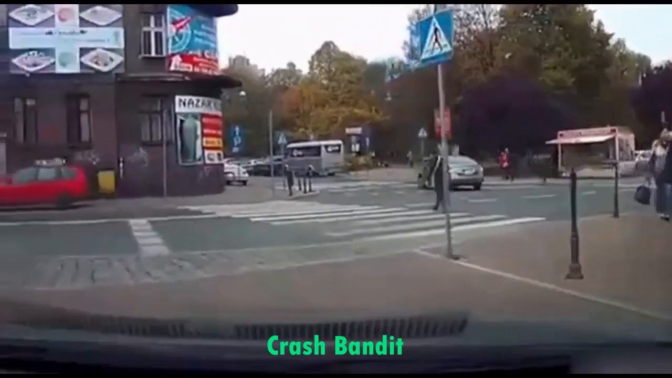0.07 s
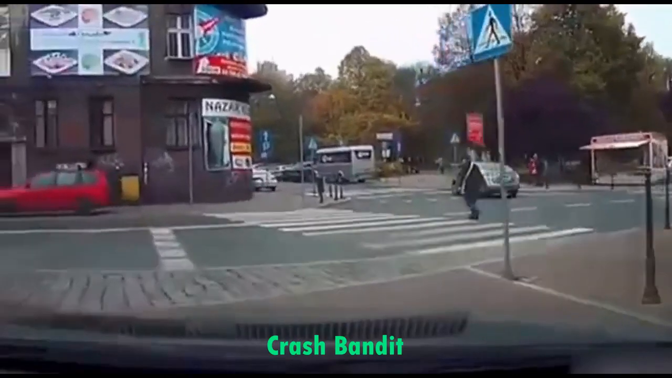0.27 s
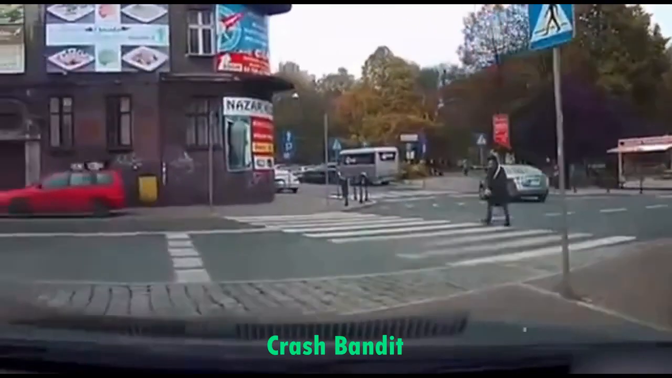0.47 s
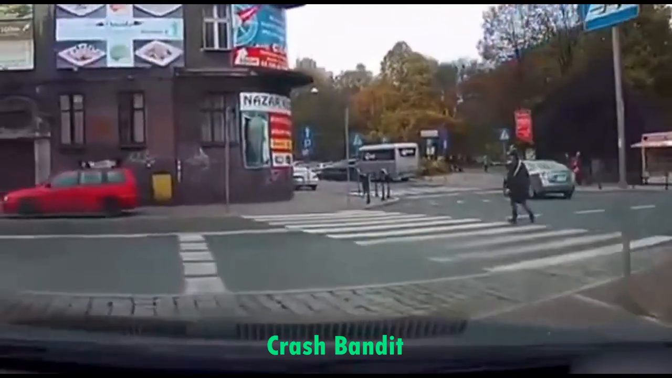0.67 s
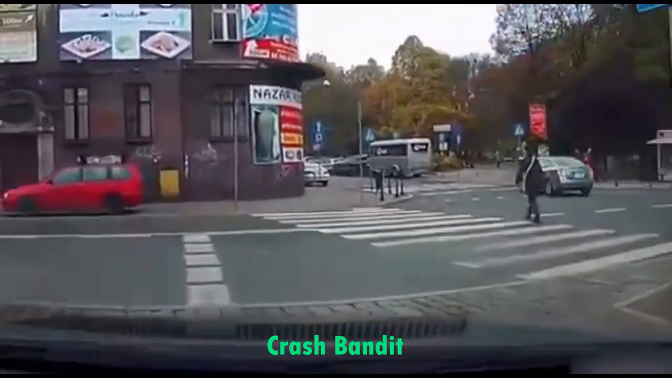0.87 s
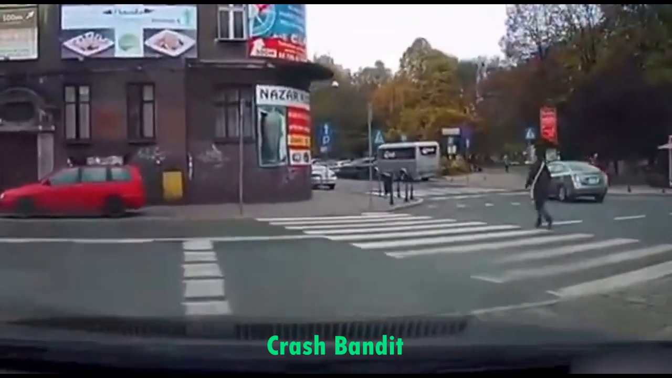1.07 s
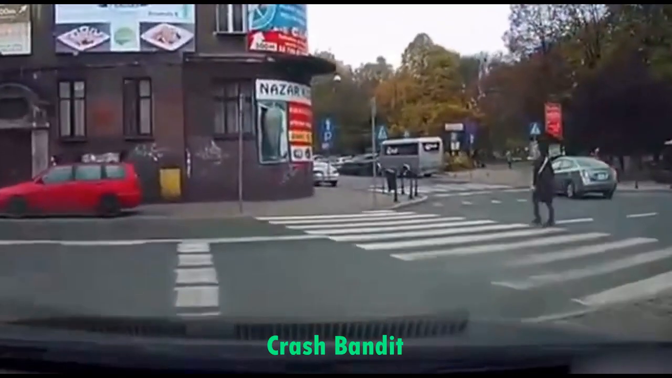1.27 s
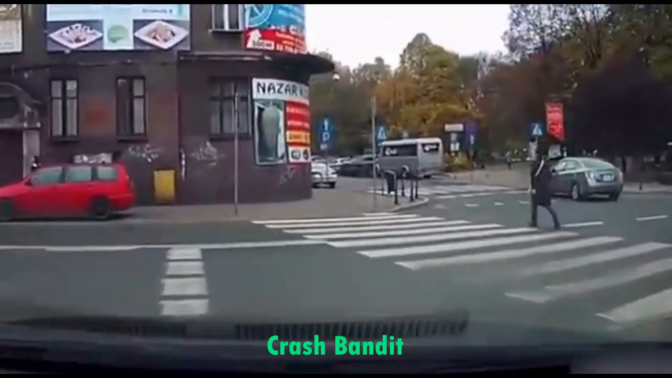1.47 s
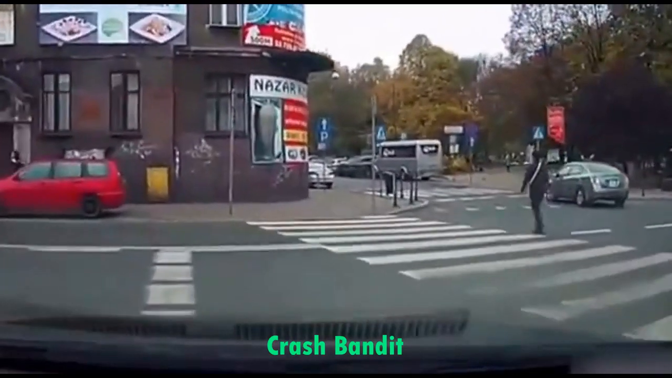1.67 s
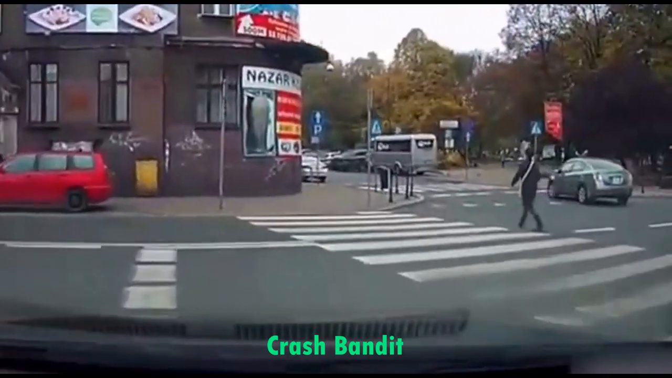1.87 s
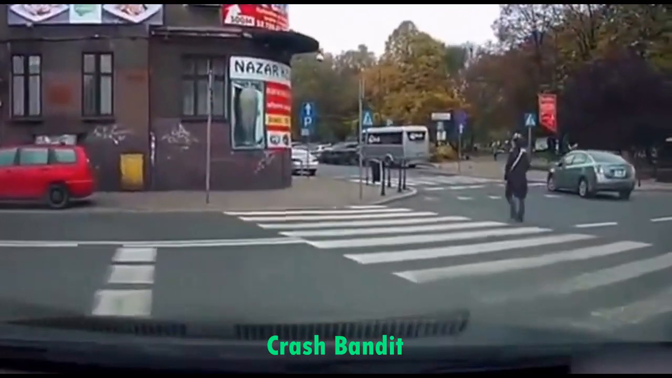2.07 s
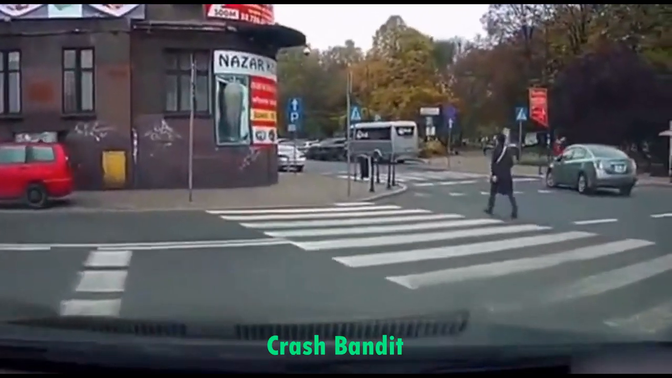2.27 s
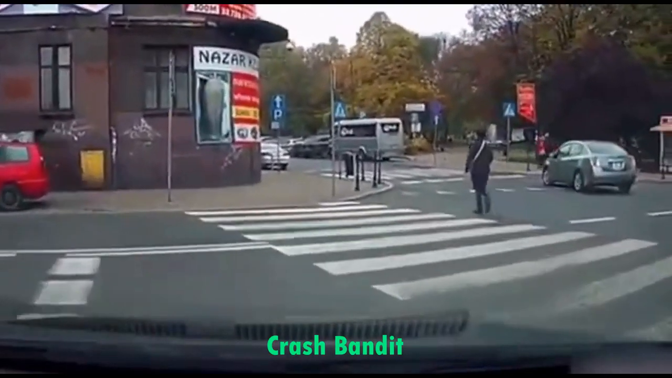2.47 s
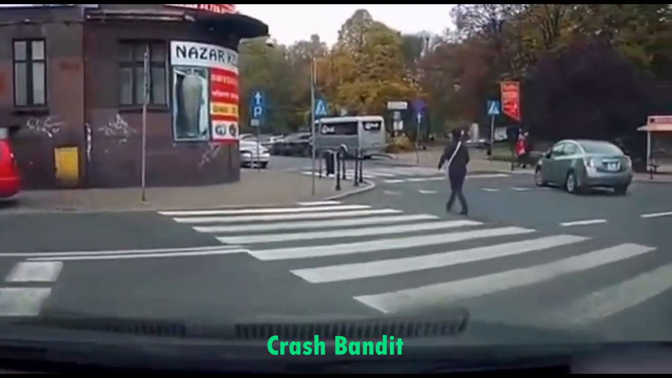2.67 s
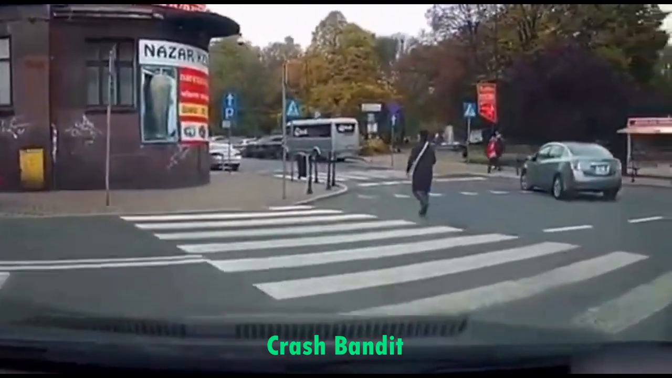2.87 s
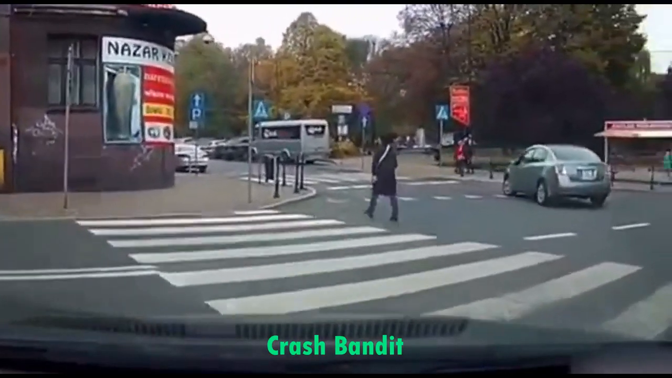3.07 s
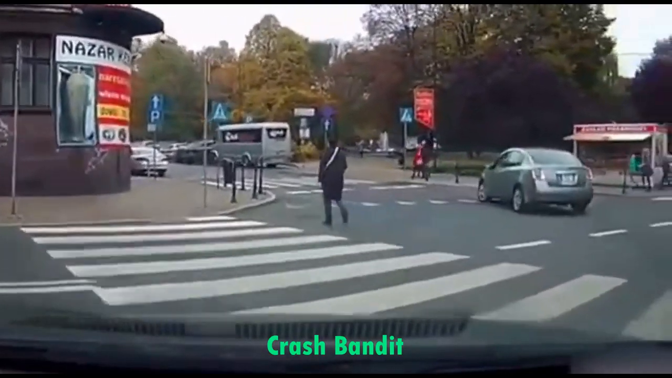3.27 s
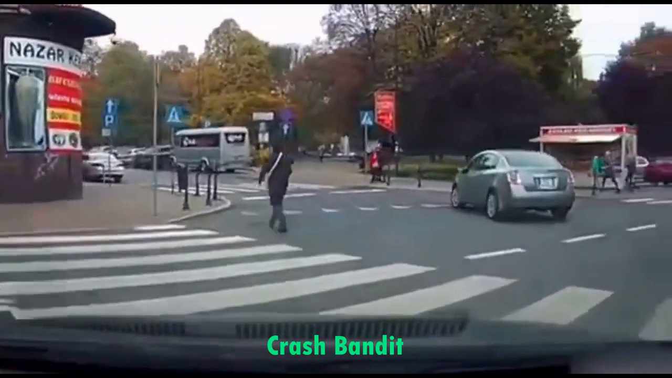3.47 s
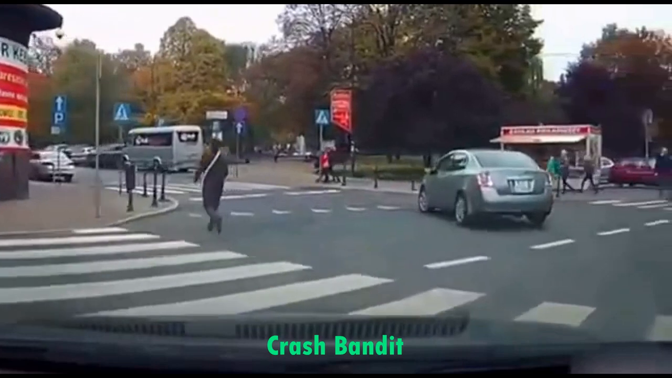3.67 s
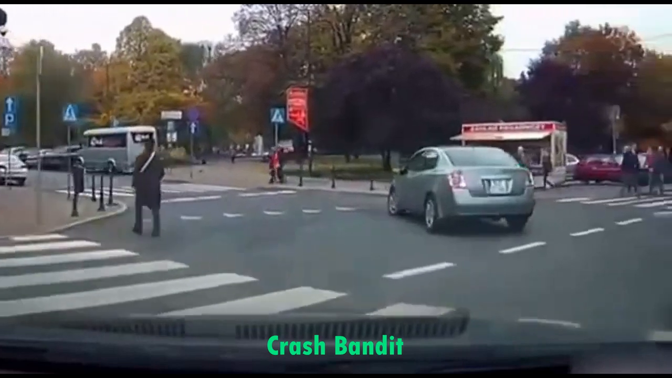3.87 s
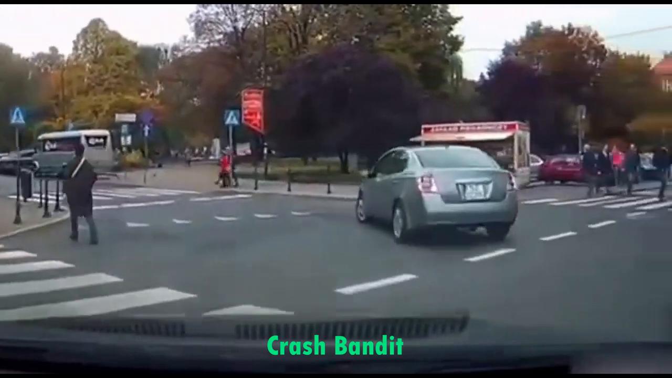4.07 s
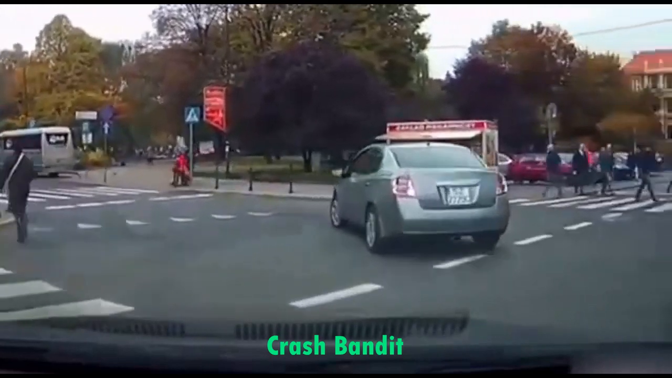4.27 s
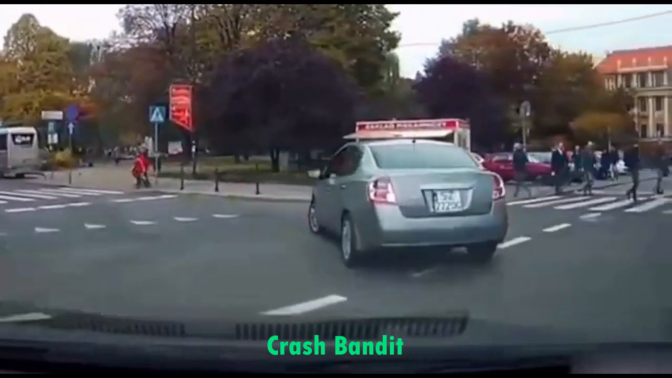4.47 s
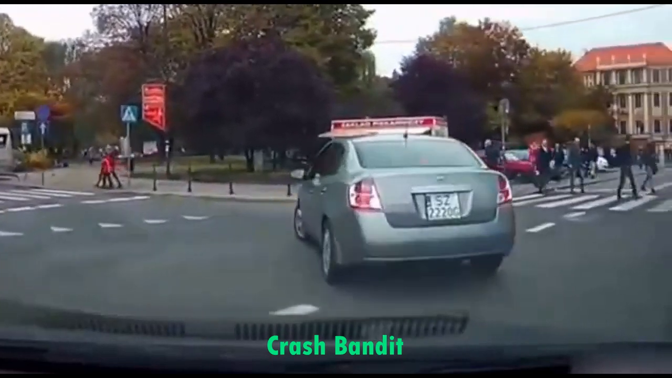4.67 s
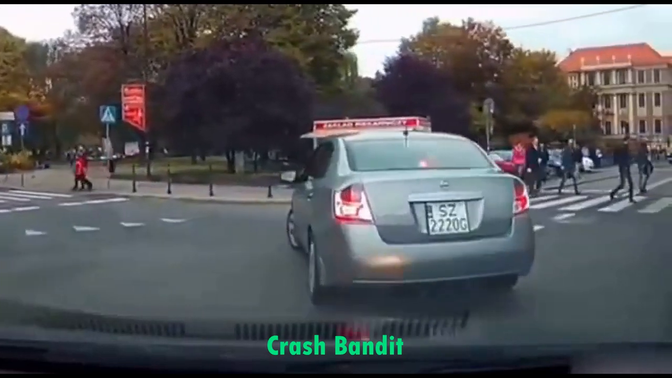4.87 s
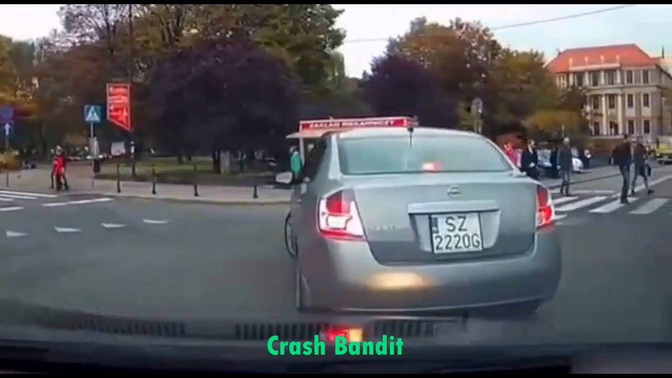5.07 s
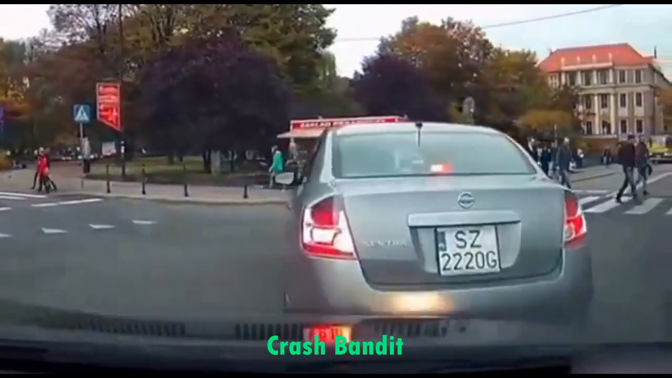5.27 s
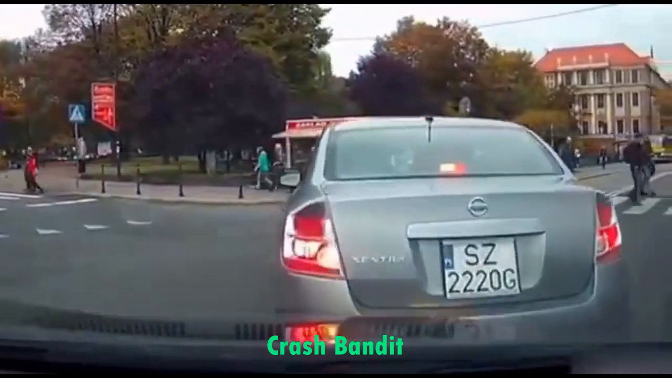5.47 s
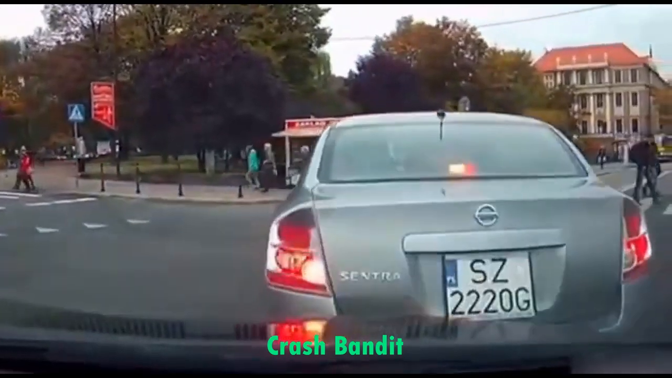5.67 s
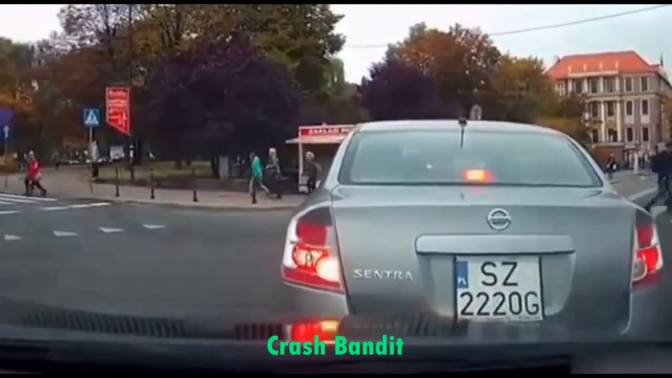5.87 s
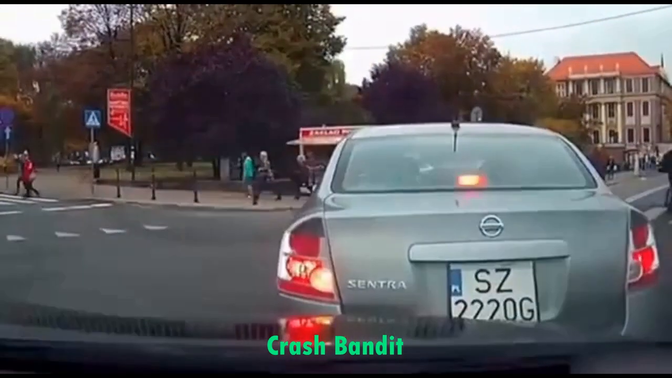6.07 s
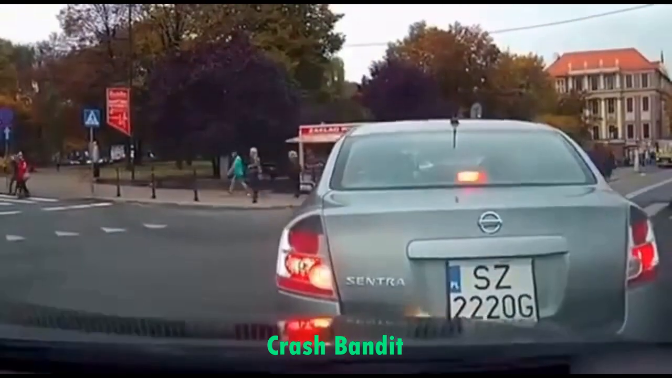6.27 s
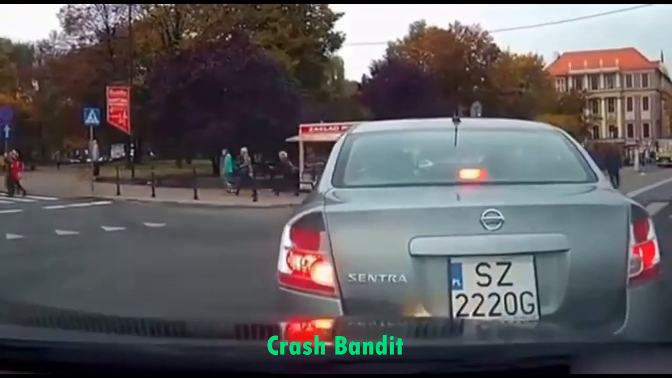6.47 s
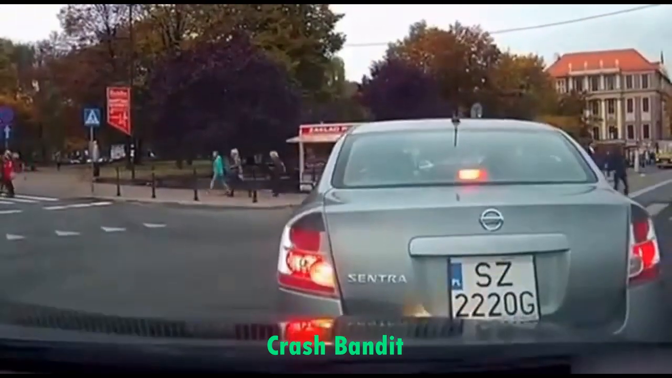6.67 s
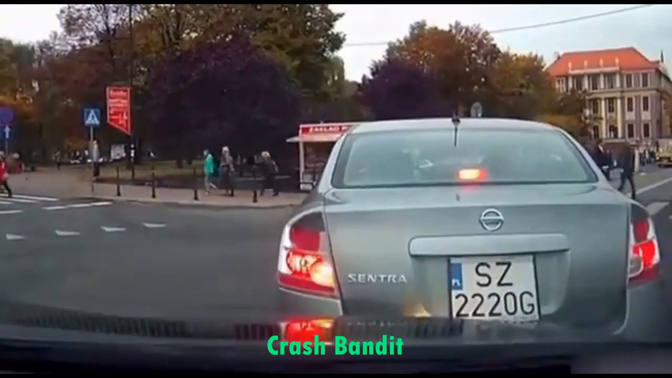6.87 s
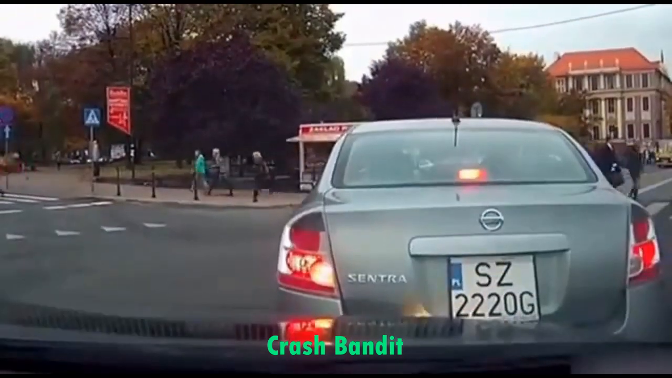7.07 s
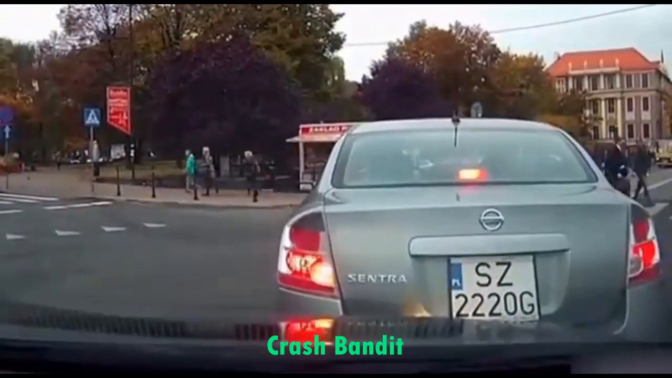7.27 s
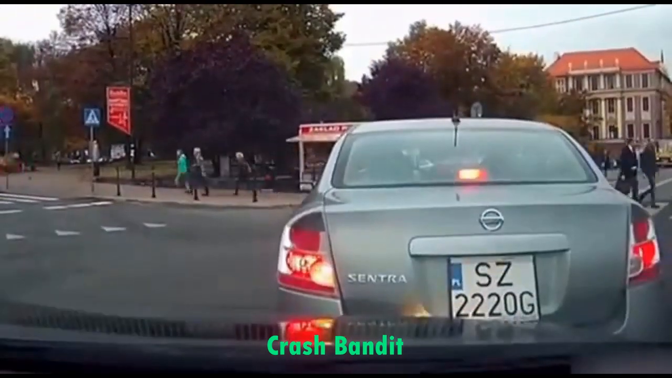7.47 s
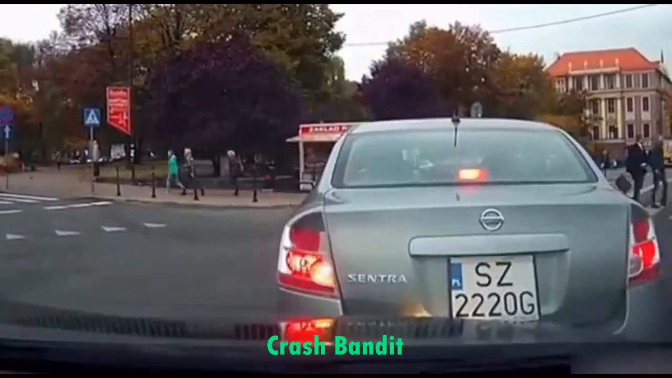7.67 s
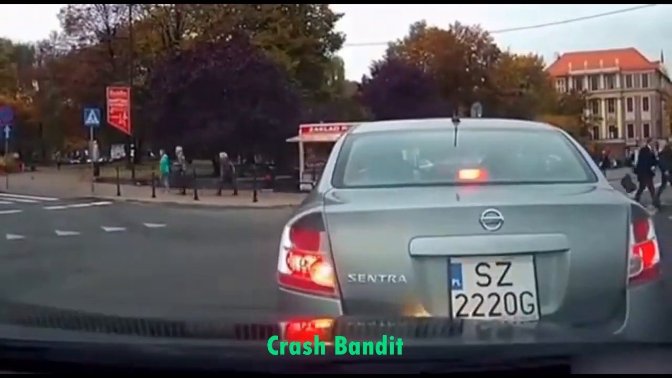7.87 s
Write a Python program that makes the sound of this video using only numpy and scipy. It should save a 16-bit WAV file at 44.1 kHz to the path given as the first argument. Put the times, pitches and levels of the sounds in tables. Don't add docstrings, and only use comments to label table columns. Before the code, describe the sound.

Heard from a microphone behind the windscreen, a car drones through a junction, wheels booming over paving seams and trim ticking lightly. The engine note sinks, rises briefly mid-turn, then drops as the car brakes. It hits the car ahead with one sudden heavy thud, ringing panels and crunching bumper plastic. Loose plastic rattles and tiny metal pieces tinkle faintly, then the engine settles to a low idle.

```python
import sys
import numpy as np
from scipy import signal
from scipy.fft import rfft, irfft, next_fast_len
from scipy.io import wavfile
from scipy.ndimage import uniform_filter1d

SR = 44100
rng = np.random.default_rng(int(sys.argv[2]) if len(sys.argv) > 2 else 0)


def volts_from_db(level):
    exponent = np.asarray(level, float) / 20
    return 10 ** exponent


def dump_mix(stems):
    frames = np.atleast_2d(stems).T
    limited = np.clip(frames, -1, 1)
    pcm = np.round(limited * 32767).astype(np.int16)
    wavfile.write(sys.argv[1], SR, pcm)


N = 349391

# (time [s], peak [dB], brightness [dB per octave], panel struck [Hz])
BUMP_BLOWS = [(5.6825, -16, -5, 151), (5.688, -13.5, 5.5, 329), (5.693, -8, 1, 243), (5.709, -33, 2, 1500),
              (5.714, -13, 4, 539), (5.756, -31, 0, 1107), (5.808, -25, -1, 130), (5.835, -16, -4.5, 290),
              (5.868, -22, 5, 100.3), (5.97, -27.5, -10.5, 890), (6.005, -30, 0, 700),
              (6.03, -29, -1, 1000), (6.115, -35, 4, 394)]


def bump():
    blows = body(BUMP_BLOWS, gain_db=-14.0, boom_db=-8.5, ring_share=0.82, contact_s=0.025)
    return signal.lfilter([0.45], [1, -0.55], blows)


# (pitch [Hz], level [dB], time to fall 60 dB [s])
BODY_MODES = [(31.6, 0, 0.84), (79, -0.5, 0.11), (128, 0.5, 0.057), (205, -9.5, 0.3), (251.5, 3, 0.12),
              (329, 2.5, 0.11), (432.5, -5.5, 0.14), (539, -5.5, 0.12), (700, 1, 0.012),
              (900, -11.5, 0.098), (1000, -16, 0.11), (1080, -11.5, 0.045), (1380, -26, 0.01),
              (1700, -27.5, 0.023), (2200, -30, 0.047), (2600, -27, 0.04), (2850, -29.5, 0.012),
              (3400, -35.5, 0.0098)]


def body(hits, gain_db, boom_db, ring_share, contact_s):
    times, peak_db, bright_db, panel_hz = np.transpose(hits)
    chance = rng.standard_normal((len(hits), len(BODY_MODES)))
    out = np.zeros(N)
    for k, (hz, mode_db, t60) in enumerate(BODY_MODES):
        tilt_db = bright_db * np.log2(hz / 250) + boom_db * (hz < 100)
        panel_db = 8 * np.exp(-(np.log2(hz / panel_hz) / 0.26) ** 2)
        hit_db = peak_db + gain_db + mode_db + tilt_db + panel_db + 2.6 * chance[:, k]
        sign = (-1) ** (k // 3 + 1)
        clicks = clicks_at(times, sign * volts_from_db(hit_db))
        if hz > 600:
            clicks = scuff(clicks, contact_s)
        out += ring(clicks, hz, t60 * ring_share)
    return out


# (time [s], hold [s], thud level [dB], crackle level [dB], brightness
# [dB])
CRUMPLES = [(5.679, 0.0061, -10, -20.5, -20), (5.71, 0.017, -31, -31, -18), (5.742, 0.047, -24, -36, -15.5),
            (5.803, 0.041, -19, -28.5, -19.5), (5.852, 0.019, -35, -40.5, -8),
            (5.889, 0.034, -24, -32.5, -15), (5.946, 0.047, -43, -31.5, -18), (6, 0.05, -38, -37, -14),
            (6.069, 0.051, -38.5, -45, -18), (6.151, 0.046, -36.5, -47.5, -16),
            (6.225, 0.011, -44, -40.5, -19), (6.256, 0.014, -32, -43.5, -15), (6.29, 0.05, -37.5, -46, -21),
            (7.682, 0.023, -35, -44, -17)]
# (frequency [Hz], level [dB per Hz])
THUD_COLOUR = [(53, -32), (90, 5), (135, 10.5), (178, 0), (504, -9), (550, -25), (600, -29), (780, -43),
               (1320, -120)]
CRACKLE_COLOUR = [(240, -9.5), (400, -2), (444, -3), (512, 0), (872, 0.5), (1080, -5.5), (1460, -14.5),
                  (2400, -43), (3120, -54), (5280, -120)]
BRIGHT_COLOUR = [(1060, -54), (1800, 1), (2660, 2), (3720, -10), (4860, -8.5), (8570, -21.5), (9530, -30),
                 (9960, -28), (11600, -31), (15000, -34.5)]


def crunch():
    low, mid, high = np.zeros((3, N))
    for s, hold_s, thud_db, crackle_db, bright_db in CRUMPLES:
        shape = pulse(s, 0.012, hold_s, 515)
        low += volts_from_db(thud_db) * shape
        mid += volts_from_db(crackle_db) * shape
        high += volts_from_db(crackle_db + bright_db) * shape
    cracks = grains(per_s=5500, spread_db=3.0)
    thuds = np.minimum(volts_from_db(-4) * low, 0.055) * colour(rng.standard_normal(N), THUD_COLOUR)
    crackle = mid * colour(cracks, CRACKLE_COLOUR) + high * colour(cracks, BRIGHT_COLOUR)
    return thuds + volts_from_db(-6.5) * crackle


# (time [s], peak [dB], pitch [Hz], time to fall 60 dB [s])
PANEL_RINGS = [(5.687, -15.5, 291, 0.06), (5.707, -15.5, 546, 0.1), (5.72, -35.5, 1050, .05),
               (5.751, -26, 523, .05), (5.757, -29, 1080, .04), (5.769, -32.5, 1100, 0.045),
               (5.809, -7.5, 51, 0.06), (5.811, -16, 234, 0.066), (5.83, -27, 1080, .04),
               (5.858, -26, 756, 0.071), (5.892, -29.5, 527, .04), (5.958, -23.5, 262, 0.039),
               (5.972, -33.5, 1004, 0.057), (6.005, -23, 654, 0.046), (6.024, -24, 296.6, 0.054),
               (6.03, -32, 1033, 0.065), (6.058, -36, 608, .03), (6.06, -47, 2840, 0.018),
               (6.117, -31, 334, 0.098), (6.166, -37, 503, 0.031), (6.234, -36.5, 654, .04),
               (6.236, -29.5, 335, 0.066), (6.242, -42, 1380, 0.021), (6.288, -43, 700, .03),
               (6.311, -35, 604, 0.032), (6.335, -45, 761, .03), (5.69, -14.5, 74, 0.15),
               (5.872, -48, 4120, .025), (5.894, -42, 4280, 0.034), (5.907, -37, 4120, .03),
               (5.693, -41.5, 2930, .03), (5.7, -44, 1980, 0.021), (5.688, -20.5, 850, 0.027),
               (5.689, -35, 1613, .03), (5.69, -33, 2277, 0.027), (5.697, -21.5, 317, 0.025),
               (5.711, -35, 2700, 0.035), (5.72, -23.5, 575, 0.037), (5.94, -32, 970, 0.063),
               (6.037, -34.5, 990, .04), (6.232, -58.5, 5380, .015), (6.28, -50.5, 2510, 0.024),
               (6.565, -38, 319.4, 0.049), (7.7, -39, 800, 0.027), (7.711, -30, 327, 0.033),
               (7.712, -38, 600, 0.027), (7.705, -57, 2700, .02)]
# (time [s], peak [dB], pitch
# [Hz], time to fall 60 dB [s])
PLASTIC_SNAPS = [(.782, -58, 3740, .02), (.786, -61, 4400, .015), (.812, -64, 4200, .015),
                 (5.68, -42, 2500, .02), (5.685, -45, 3900, .012), (5.69, -42, 4400, 0.014),
                 (5.698, -42, 3200, .015), (5.711, -40.5, 2110, .02), (5.712, -33, 1600, .02),
                 (5.72, -41, 2850, .025), (5.73, -42, 2700, .02), (5.752, -40.5, 1610, 0.017),
                 (5.756, -46, 2400, .015), (5.772, -40, 1342, .02), (5.817, -44.5, 2700, .02),
                 (5.84, -38, 1700, .02), (5.853, -43, 2600, .02), (5.872, -45.5, 2900, .025),
                 (5.875, -43, 1900, .015), (5.892, -46, 1900, .02), (5.91, -44, 2350, .02),
                 (5.95, -38.5, 1350, .025), (5.99, -36, 1230, 0.029), (5.99, -56, 3450, .03),
                 (6.03, -50.5, 3300, 0.025), (6.052, -48, 2100, .02), (6.09, -58, 2900, 0.018),
                 (6.114, -48, 1500, .025), (6.12, -56, 2900, .015), (6.165, -53, 2000, .03),
                 (6.18, -58, 2450, 0.021), (6.2, -50, 1250, .025), (6.238, -44.5, 1400, .025),
                 (6.242, -58, 3400, 0.019), (6.29, -43, 1350, 0.028), (6.298, -54, 2000, .02),
                 (6.305, -59, 2700, .02), (5.894, -44.5, 3980, .02), (5.913, -47, 4350, .02),
                 (5.93, -50.5, 4140, .04), (6.055, -55, 4297, .03), (6.1, -63, 7200, .02),
                 (5.845, -66, 10400, .02), (7.7, -56, 2950, .015), (2.815, -33, 298, 0.11),
                 (2.94, -31, 305, 0.13), (.6, -59, 3900, .03)]
# (time [s], peak
# [dB], pitch [Hz])
TRIM_TICKS = [(0.18, -40, 770), (0.477, -35, 576), (0.597, -30.5, 514), (1.133, -40.5, 598),
              (1.345, -37, 616), (1.513, -43, 716), (2.351, -43, 724), (3.564, -35, 700), (4.027, -33, 626),
              (4.477, -30, 600), (4.512, -37, 516), (4.588, -42, 778), (4.645, -41, 543),
              (4.713, -38.5, 801.6), (4.778, -37.5, 527.4), (4.978, -44, 645.3), (5.042, -37, 539),
              (5.11, -43, 811.4), (6.403, -31.5, 576.7), (6.936, -48, 611)]


def panels_and_trim():
    ticks = [(s, db - 2, hz, 0.036) for s, db, hz in TRIM_TICKS]
    length = SR // 4
    out = np.zeros(N + SR)
    for s, peak_db, hz, t60 in PANEL_RINGS + ticks + PLASTIC_SNAPS:
        click = volts_from_db(peak_db) * (np.arange(length) == 0)
        if hz > 400:
            click = scuff(click, 0.008)
        partner = ring(click, min(1.4 * hz, 15000), 0.2 * t60)
        out[int(s * SR):][:length] += ring(click, hz, t60) + volts_from_db(-13.5) * partner
    return out[:N]


# (time [s], level [dB])
RATTLE_HITS = [(5.937, -55), (5.69, -46), (5.871, -52), (5.892, -43.5), (5.896, -48), (5.908, -41),
               (5.916, -44), (5.924, -62.5), (5.931, -53), (5.943, -54), (5.951, -55), (6.231, -67)]
# (pitch [Hz], level [dB], time to fall 60 dB [s])
PLASTIC_MODES = [(3774.3, 1.5, 0.016), (4120, 5, 0.014), (4230, 2, .014), (4600, -7, 0.01),
                 (4900, -8, 0.012), (5430, -6, 0.018), (6000, -6, 0.013), (6500, -9, 0.0152),
                 (6580, -4.5, 0.019), (7300, -19.5, 0.0123), (11110, -17, 0.0073)]
# (time [s], low ring level [dB], high ring level [dB])
TINKLES = [
    (5.835, -54, -73),
    (6.026, -58, -58),
    (6.04, -65, -62),
    (6.064, -61, -66),
    (6.106, -65, -82),
    (6.351, -56, -87),
    (6.399, -58, -89),
]
# (pitch [Hz], time to fall 60 dB [s])
METAL_MODES = [(9400, 0.03), (11700, 0.04)]


def loose_things():
    times, level_db = np.transpose(RATTLE_HITS)
    chance = rng.standard_normal((len(RATTLE_HITS), len(PLASTIC_MODES)))
    out = np.zeros(N)
    for k, (hz, mode_db, t60) in enumerate(PLASTIC_MODES):
        hits = clicks_at(times, volts_from_db(level_db + mode_db + 2.4 * chance[:, k]))
        out += ring(scuff(hits, 0.016), hz, t60)
    out += np.diff(clicks_at([6.1], volts_from_db(-37)), prepend=0)
    times, *ring_db = np.transpose(TINKLES)
    for level_db, (hz, t60) in zip(ring_db, METAL_MODES):
        out += ring(scuff(clicks_at(times, volts_from_db(level_db)), 0.011), hz, t60)
    return out


# (time [s], firing rate [Hz], shake through the mounts [dB], throttle [dB])
ENGINE_COURSE = [(0.0, 55.5, -19, 8.5), (0.36, 52.16, -19, 6.5), (0.53, 46.1, -24.5, 4.5),
                 (0.75, 45.6, -20, 2.5), (0.94, 42.88, -30, 0), (1.0, 41.7, -41, -1.5),
                 (1.15, 39.24, -29.5, -1), (1.22, 38, -22.5, 2), (1.45, 34.6, -18.5, 0.5),
                 (1.81, 31.62, -31, 0.5), (2.42, 31.26, -55, 1), (2.71, 34.01, -23, 5.5),
                 (2.95, 34.48, -24.5, 5), (3.36, 41.4, -22.5, 10), (3.62, 41.2, -47.5, 3.5),
                 (3.84, 38.08, -20, 2), (4.25, 30.46, -30.5, -0.5), (4.7, 29.85, -32.5, -.5),
                 (5.65, 31, -35, -1), (6.08, 26.65, -36, -0.5), (7.92, 26.38, -35.5, -1.5)]
# (frequency [Hz], level [dB])
MOUNT_LEVELS = [(53, -32), (61, -38.5), (70, -53), (80, -51.5), (92, -49), (106, -44.5), (122, -64.5),
                (165, -51.5)]
# (multiple of the firing rate, level [dB])
ENGINE_OVERTONES = [(23, -61.5), (5, -56.5), (6, -58), (7, -56.5), (8, -60), (14, -62), (13, -58.5),
                    (30, -60.5), (26, -68), (16, -64.5), (18, -63)]
# (frequency [Hz], level [dB per Hz])
CLATTER_COLOUR = [(100, -31), (170, -8), (216, -1), (291, -4.5), (360, -6), (560, -5.5), (594, -5.5),
                  (793, -9.5), (864, -12.5), (1300, -26), (1690, -60.5), (2860, -120)]
UPPER_COLOUR = [(530, -26), (900, -6), (1150, -2.5), (1300, -7), (1610, -10.5), (1850, -14), (2090, -18),
                (2720, -19), (3170, -30), (4500, -28.5), (5850, -68), (9900, -120)]
# (pitch [Hz], width [Hz], level [dB])
CABIN_PANELS = [(353, 37, 1), (800, 72, 0), (1350, 13, 9.5), (2850, 280, 6)]


def engine(clatter_db, upper_db, swell):
    firing_hz, tone_db, _ = uniform_filter1d(in_time(ENGINE_COURSE), size=2000, axis=1)
    turn = 2 * np.pi * np.cumsum(firing_hz * (1 + 0.00419 * drift(3.26))) / SR
    follow_db = 0.082 * (tone_db + 36)
    mount_hz, mount_db = np.transpose(MOUNT_LEVELS)
    second_db, third_db, fourth_db = [np.interp(m * firing_hz, mount_hz, mount_db) + follow_db
                                      for m in (2, 3, 4)]
    over_db = -2.5 - 0.8 * np.maximum(firing_hz - 31, 0)
    air_hz, air_width_hz = 39.8, 6.1
    rocked = volts_from_db(-2) * swell * np.exp(-((firing_hz - air_hz) / air_width_hz) ** 2)
    stumble_db = -6 * pulse(6.0, 0.13, 0.4, 96)

    tones = (volts_from_db(tone_db) + rocked) * np.cos(turn)
    tones += volts_from_db(second_db + stumble_db) * np.cos(2 * turn + 0.75)
    tones += volts_from_db(third_db) * np.cos(3 * turn + 0.4)
    tones += volts_from_db(fourth_db + over_db) * np.cos(4 * turn + 1.1)
    for multiple, level_db in ENGINE_OVERTONES:
        fade_db = over_db - 0.15 * multiple * np.maximum(firing_hz - 27, 0)
        phase = rng.uniform(0, 2 * np.pi)
        tones += volts_from_db(level_db + fade_db + 0.88 * drift(3.1)) * np.cos(round(multiple) * turn + phase)

    firing = volts_from_db(3.0 * np.cos(turn + 2.8) + 1.1 * np.cos(turn / 2))
    noise = colour(rng.standard_normal(N), CLATTER_COLOUR)
    clatter = volts_from_db(clatter_db + 0.69 * drift(31.0)) * firing * noise
    upper = colour(rng.standard_normal(N), UPPER_COLOUR)
    clatter += volts_from_db(upper_db + 1.2 * drift(17.0)) * firing * upper
    panels = clatter.copy()
    for hz, width_hz, level_db in CABIN_PANELS:
        r = np.exp(-np.pi * width_hz / SR)
        feedback = [1, -2 * r * np.cos(2 * np.pi * hz / SR), r * r]
        peak = signal.lfilter([(1 - r * r) / 2, 0, (r * r - 1) / 2], feedback, clatter)
        panels += (volts_from_db(level_db) - 1) * peak
    return np.sqrt(2) * tones + volts_from_db(-0.5) * panels + combustion(turn, upper_db)


# (pitch [Hz], level [dB], time to fall 60 dB [s])
BLOCK_MODES = [(376, -0.5, 0.045), (533, -6.5, 0.025), (600, -11, 0.018), (700, -5, 0.042), (811, -4, 0.04),
               (1000, -12.5, 0.034), (1440, -18, 0.039), (2720, -30.5, 0.011)]


def combustion(turn, upper_db):
    fired = np.diff(np.floor(turn / (2 * np.pi) + 0.62), prepend=0) > 0
    force_db = np.minimum(upper_db, -64) + 20 + 1.5 * np.cos(turn / 2) + 1.5 * rng.standard_normal(N)
    knocks = fired * volts_from_db(force_db)
    return sum(ring(scuff(knocks, 0.06) * volts_from_db(level_db), hz, t60) for hz, level_db, t60 in BLOCK_MODES)


# (time [s], peak [dB], pitch [Hz])
SEAM_HITS = [(0.024, -17.5, 40.9), (0.132, -17.5, 42), (0.235, -18.5, 52.3), (0.31, -8.5, 43.3),
             (0.422, -12, 40.7), (0.559, -6.5, 45.26), (.82, -24.5, 37), (0.919, -31, 51.4),
             (1.057, -29, 37.2), (1.168, -19.5, 38.1), (1.309, -23.5, 45.2), (1.528, -18, 35.15),
             (1.73, -19.5, 41.8), (1.897, -20, 35.52), (1.958, -16, 39.7), (2.056, -18.5, 41.19),
             (2.272, -14, 42.6), (2.463, -16, 38.6), (2.703, -21, 45.13), (2.801, -13.5, 38.5),
             (3.084, -16, 40.7), (3.359, -16, 39.5), (3.505, -25, 48.06), (3.673, -14.5, 43.4),
             (4.025, -19, 40.5), (4.36, -20.5, 44), (5.83, -13.5, 29.24), (5.948, -16, 35.5),
             (6.256, -19, 49.2), (0.528, -23, 133), (0.7, -20.5, 93), (0.792, -20, 93.5), (1.2, -31.5, 84),
             (1.301, -24, 79.4), (3.5, -30, 88), (2.089, -27.5, 132.1), (6.257, -22, 106.8),
             (7.693, -30.5, 132.4), (0.031, -28, 106), (.1, -30.5, 144), (.42, -29, 91.8), (1.15, -30, 144),
             (1.62, -32, 98), (2.2, -30, 105), (2.72, -29, 91), (3.021, -31, 106), (3.222, -25.5, 79.95),
             (3.379, -32.5, 128), (3.72, -25.5, 70.07), (3.75, -32.5, 110), (4.052, -30, 95.1)]


def seams():
    boom, swell = np.zeros((2, N + SR))
    age = np.arange(SR) / SR
    for s, peak_db, hz in SEAM_HITS:
        cycles = age * hz
        shape = (1 - np.exp(-cycles / 0.9)) * volts_from_db(peak_db + 6.5 - 60 * cycles / 22.5)
        boom[int(s * SR):][:SR] += shape * np.sin(2 * np.pi * cycles)
        swell[int(s * SR):][:SR] += shape * (hz < 70)
    return volts_from_db(-3) * boom[:N], swell[:N]


# (time [s], peak [dB], brightness [dB per octave], panel struck [Hz])
ROAD_KNOCKS = [(.179, -20.5, -4, 203), (.278, -22, -0.5, 397), (.597, -22, -1.5, 520), (.769, -36, 6, 100),
               (1.149, -26.5, 3, 406), (1.509, -28, 3.5, 496.7), (1.969, -35, 4.5, 410.3),
               (2.19, -20, -0.5, 623), (2.811, -22, -2, 305), (2.838, -22, 0.5, 310),
               (2.959, -21.5, -2, 298), (3.119, -21.5, 1.5, 800), (3.512, -28, 5.5, 700),
               (3.559, -21.5, -7, 600), (3.789, -28.5, 4.5, 900), (4.025, -25.5, 1.5, 800),
               (4.475, -28, 3.5, 618.9), (4.776, -33, 0, 600), (5.109, -31.5, -4, 600),
               (6.164, -39, 5, 600), (6.232, -22, -5, 870), (6.263, -31, 0, 119.9), (6.285, -18, 0.5, 120),
               (6.557, -27, -11, 303.3), (6.704, -38, 6, 700), (7.697, -44, -12, 128.8),
               (7.712, -24.5, 3, 134)]


def road_knocks():
    return body(ROAD_KNOCKS, gain_db=-20, boom_db=-10, ring_share=0.6, contact_s=0.03)


# (frequency [Hz], level [dB per Hz])
BOOM_COLOUR = [(12, -33.5), (17, -17), (22, -15.5), (28, 1), (36, 3), (43, 6), (52, 4.5), (62, -11.5),
               (75, -25), (95, -45)]
RUMBLE_COLOUR = [(35, -13), (60, -3), (81, -9), (146, -16), (177, -29), (296, -26.5), (420, -42.5),
                 (550, -65), (920, -120)]


def road(boom_db, rumble_db):
    boom = volts_from_db(boom_db - 6 + 1.2 * drift(4.7)) * colour(rng.standard_normal(N), BOOM_COLOUR)
    rumble_gain = volts_from_db(rumble_db + 2.0 + 0.15 * drift(21.0))
    return rumble_gain * colour(rng.standard_normal(N), RUMBLE_COLOUR) - boom


# (frequency [Hz], level [dB per Hz])
HISS_COLOUR = [(1760, -8), (3000, -1.5), (4060, -6.5), (4650, -5), (7540, -7), (8180, -8), (15000, -10.5)]
# (pitch [Hz], level [dB])
WHINE_TONES = [(7881, -88)]


def hiss_and_whine():
    out = volts_from_db(-72.5) * colour(rng.standard_normal(N), HISS_COLOUR)
    for hz, level_db in WHINE_TONES:
        out += np.sqrt(2) * volts_from_db(level_db) * np.sin(2 * np.pi * hz * np.arange(N) / SR)
    return out


def in_time(rows):
    s, *columns = np.transpose(rows)
    return [np.interp(np.arange(N) / SR, s, column) for column in columns]


def rms_one(x):
    return x / np.sqrt(np.mean(x ** 2) + 1e-20)


def drift(rate):
    r = np.exp(-80 * np.pi * rate / SR)
    noise = rng.standard_normal(N // 40 + 2002)
    slow = signal.lfilter([1], [1, -2 * r, r * r], noise)[2000:]
    return np.interp(np.arange(N) / 40, np.arange(len(slow)), rms_one(slow))


def colour(x, spectrum):
    size = next_fast_len(N)
    hz, level_db = np.transpose(spectrum)
    axis = np.log(np.maximum(np.arange(size // 2 + 1) * SR / size, 1))
    shape = volts_from_db(np.interp(axis, np.log(hz), level_db, left=-120, right=-120))
    return rms_one(irfft(rfft(x, size) * shape, size)[:N])


def ring(clicks, hz, t60):
    r, w = volts_from_db(-60 / (t60 * SR)), 2 * np.pi * hz / SR
    return signal.lfilter([0, np.sin(w)], [1, -2 * r * np.cos(w), r * r], clicks + 1e-18)


def clicks_at(times, sizes):
    clicks = np.zeros(N)
    clicks[(np.asarray(times) * SR).astype(int)] = sizes
    return clicks


def grains(per_s, spread_db):
    sizes = volts_from_db(spread_db * np.minimum(rng.exponential(1, N), 4)) * rng.choice([-1, 1], N)
    return sizes * (rng.random(N) < per_s / SR)


def scuff(clicks, t60):
    age = np.arange(int(t60 * SR)) / (t60 * SR)
    burst = rng.standard_normal(len(age)) * np.sqrt(age) * volts_from_db(-60 * age)
    return signal.oaconvolve(clicks, burst / np.linalg.norm(burst))[:len(clicks)]


def pulse(start_s, rise_s, hold_s, fall_db_per_s):
    age = np.arange(N) / SR - start_s
    return np.clip(age / rise_s, 0, 1) * volts_from_db(-fall_db_per_s * np.clip(age - rise_s - hold_s, 0, 1))


def raised(level_db, gain):
    return 10 * np.log10(volts_from_db(level_db) ** 2 + gain ** 2)


# (time [s], roughness times speed [dB])
PAVING_COURSE = [(0, -11), (.5, -13.5), (.9, -19.5), (1.3, -17), (1.9, -23), (2.35, -20), (2.7, -19.5),
                 (3.2, -17), (3.9, -18.5), (4.4, -24.5), (4.8, -25.5), (5.6, -29), (6.6, -35), (7.92, -32)]


def scene():
    shunt_s = 5.72
    shunt = pulse(shunt_s, 0.057, 0.27, 241)
    throttle_db = in_time(ENGINE_COURSE)[2]
    paving_db, = in_time(PAVING_COURSE)
    boom, swell = seams()
    clatter_db = raised(-51.5 + throttle_db, volts_from_db(-50) * shunt)
    upper_db = raised(-66 + 0.83 * throttle_db, volts_from_db(-55) * shunt)
    before_shunt = np.arange(N) < shunt_s * SR
    boom_db = raised(paving_db - 8 * before_shunt, volts_from_db(-22) * shunt)
    rumble_db = raised(-38.5 + 0.7 * (paving_db + 24.5), volts_from_db(-22) * swell + volts_from_db(-36.5) * shunt)
    crash = bump() + crunch() + panels_and_trim() + loose_things()
    ride = engine(clatter_db, upper_db, swell) + boom + road_knocks() + road(boom_db, rumble_db)
    return (crash + ride)[None]


def low_pass(x):
    return signal.sosfilt(signal.butter(12, 15130, fs=SR, output="sos"), x)


def record(dry):
    rounded = 0.7 * np.tanh((dry + hiss_and_whine()) / 0.7)
    return low_pass(np.clip(rounded, -0.45, 0.45))


dry = scene()
out = record(dry)
dump_mix(out)
```